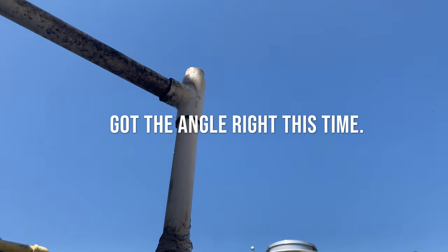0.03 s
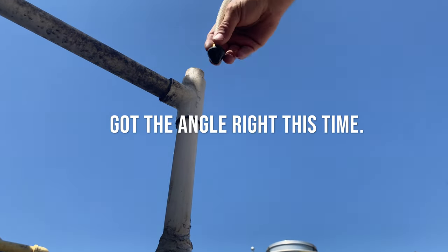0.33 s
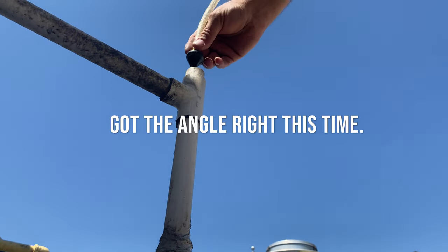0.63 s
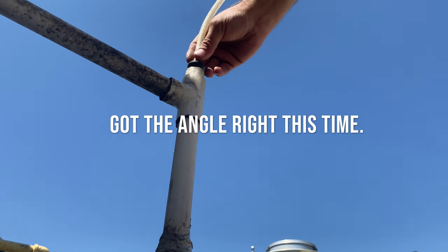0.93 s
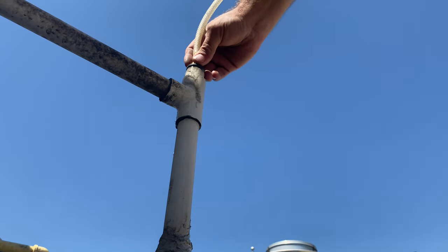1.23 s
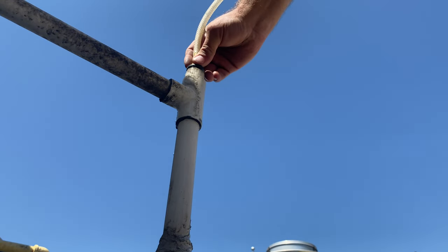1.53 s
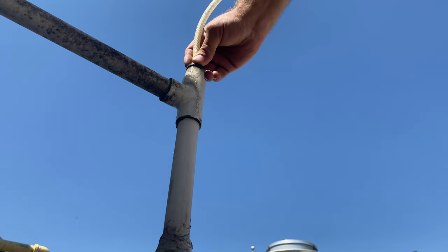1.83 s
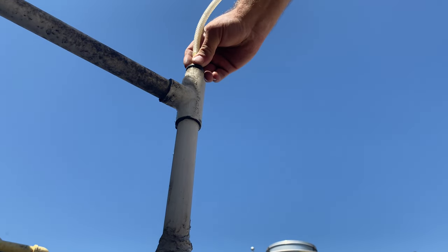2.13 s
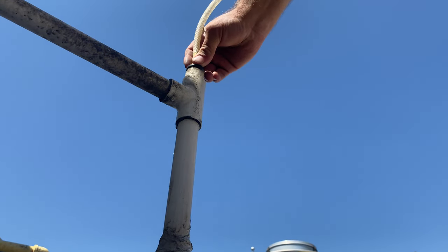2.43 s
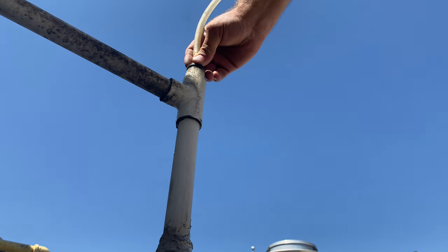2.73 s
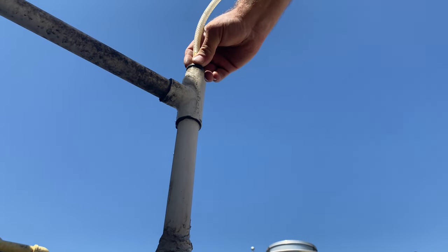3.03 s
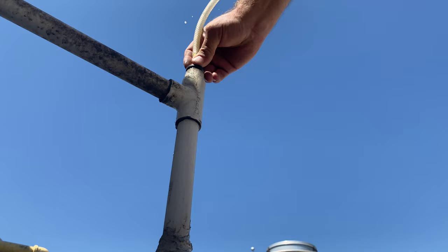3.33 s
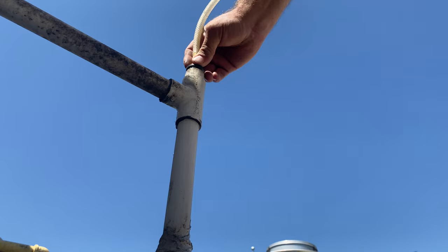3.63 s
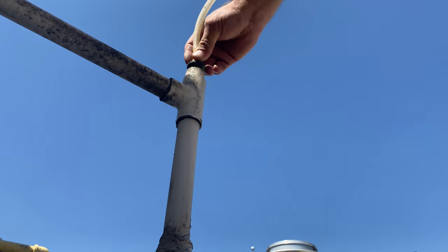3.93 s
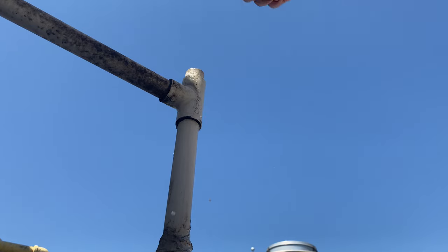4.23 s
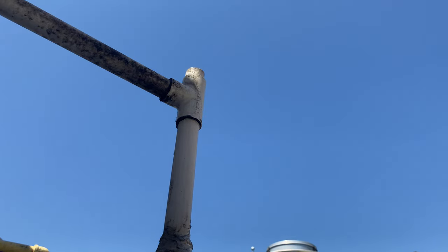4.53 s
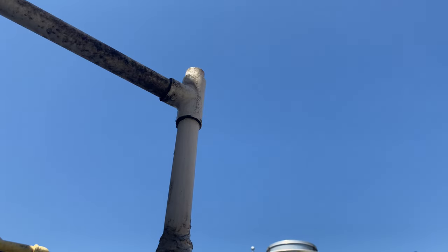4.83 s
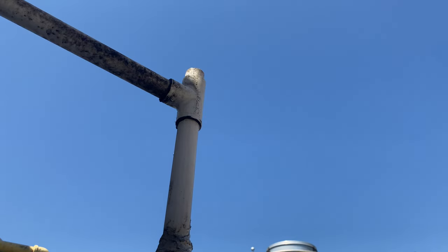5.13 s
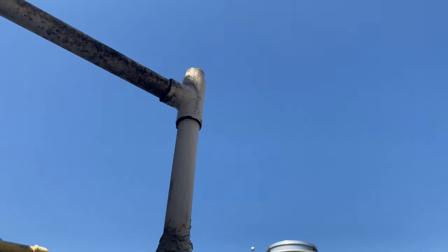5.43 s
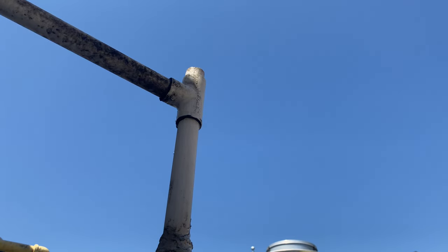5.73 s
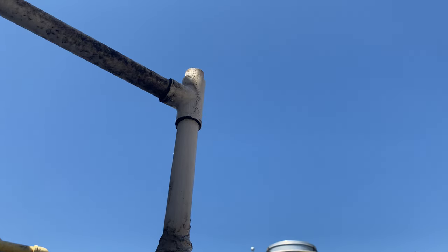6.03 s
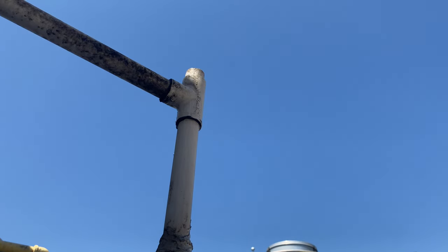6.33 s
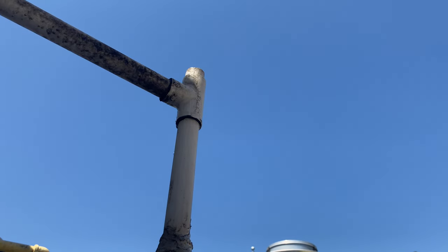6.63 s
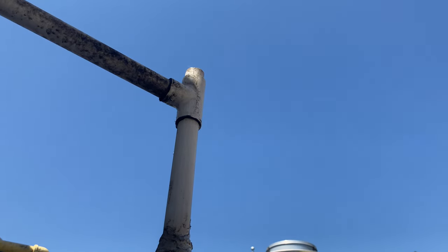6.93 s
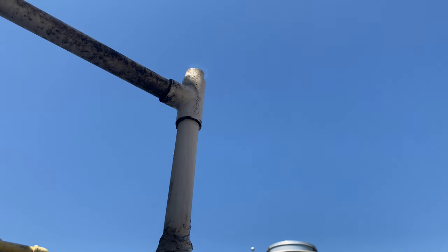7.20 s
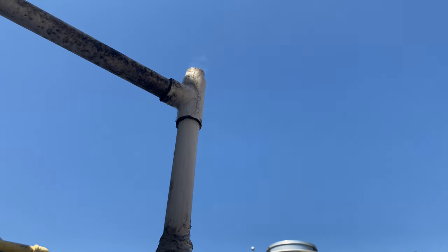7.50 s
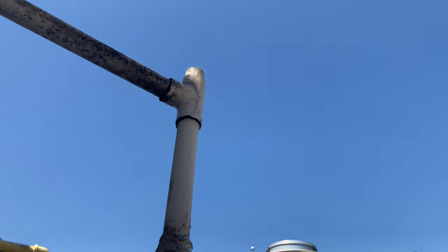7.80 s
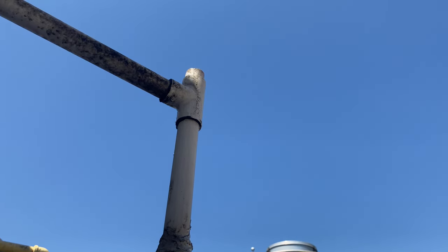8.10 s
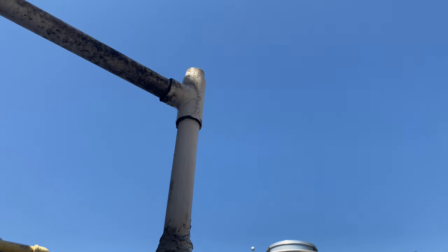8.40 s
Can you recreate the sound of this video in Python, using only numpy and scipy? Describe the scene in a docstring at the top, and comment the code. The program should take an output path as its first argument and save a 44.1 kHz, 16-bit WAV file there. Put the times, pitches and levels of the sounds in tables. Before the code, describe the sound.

A steady low roar and hum of outdoor exhaust fans, with a short wet hiss from a hose nozzle at a pipe's mouth.

```python
"""Exhaust fans drone on a flat roof throughout: roaring air, beating hums and one motor's whine.
First a hose nozzle is pressed onto an upright pipe and sizzles faintly. From about 2.4 s come low
swells: a few wind puffs, and throbs near 60 Hz like beating fan hums. At 3.1 s the nozzle lets off a
half-second jet that sputters as it starts and gargles in the pipe mouth. More sizzles and low swells
follow and, from 5.2 s, faint squeaks. Two close microphone ports (openings) pick it all up."""
import sys
import numpy as np
from scipy import signal
from scipy.fft import rfft, irfft, next_fast_len
from scipy.io import wavfile

SR = 44100
rng = np.random.default_rng(int(sys.argv[2]) if len(sys.argv) > 2 else 0)


def transcribe(signal):
    """Save signal, clipped to [-1, 1], as a 16-bit WAV file at the path in sys.argv[1]."""
    frames = np.atleast_2d(signal).T
    limited = np.clip(frames, -1, 1)
    pcm = np.round(limited * 32767).astype(np.int16)
    wavfile.write(sys.argv[1], SR, pcm)


N = 377496
TIME = np.arange(N) / SR
OPEN_S, SHUT_S = 3.116, 3.602  # the hose valve opens and shuts
OPEN_FOR_S = np.clip(TIME, OPEN_S, SHUT_S) - OPEN_S

# air passing through the fans and their ducts: (frequency [Hz], level [dB per Hz])
FAN_ROAR = [(20, -70), (40, -52.5), (58, -39), (80, -45), (115, -41.7), (180, -47.3), (255, -52.5),
            (320, -52.6), (420, -55), (560, -55.5), (740, -62), (920, -62.5), (1550, -71.5), (2600, -80.5),
            (6000, -100)]
# pitches at which the fan housings ring: (frequency [Hz], width [Hz], boost [dB])
HOUSING_RINGS = [(219.6, 9.3, 2.5), (362, 24, 4.4), (468, 27, 2.2), (1865, 90, 2.5)]


def jet(level_db=-1.5, build_db_per_s=6.5, rough_db=1.4):
    """The jet hisses in the pipe mouth while the valve is open, growing a little louder."""
    # the hiss of the jet: (frequency [Hz], level [dB])
    hiss = [(1200, -71), (2200, -81), (3700, -83), (5000, -80), (6200, -81), (7000, -72.5), (8300, -76),
            (9600, -68), (10600, -70.5), (11700, -73.5), (13700, -75), (15500, -76)]
    # pitches that ring across the pipe mouth: (frequency [Hz], width [Hz], boost [dB])
    pipe_rings = [(4230, 110, 1), (5130, 230, 1), (6920, 230, 4.5), (8050, 170, 4), (9400, 150, 2),
                  (11880, 150, -2), (15390, 220, 5.5)]
    flow = noise(hiss, pipe_rings) * valve()
    return flow * gain_of(level_db + build_db_per_s * OPEN_FOR_S + rough_db * wander(250))


def valve(attack_s=.011, release_s=.008):
    """The flow through the nozzle rises quickly, holds, then dies away."""
    opening = np.clip((TIME - OPEN_S) / attack_s, 0, 1)
    return opening * np.exp(-np.maximum(TIME - SHUT_S, 0) / release_s)


def sputter(delay_s=.013, rise_s=.012, clear_db_per_s=22, rough_db=2.0, ring_db=1.5):
    """Water arrives and chops up the stream: one full spurt, then less and less as it clears."""
    # the chopped stream: (frequency [Hz], level [dB])
    spectrum = [(500, -68), (1050, -60), (1700, -71), (2600, -73.5), (3700, -70.7), (4800, -72.3),
                (5900, -72), (6500, -80), (9000, -85), (15000, -88)]
    arrived = np.clip((OPEN_FOR_S - delay_s) / rise_s, 0, 1)
    spurt = gain_of(-9) * bump(OPEN_S + .06, half_s=.03)
    clearing = gain_of(-4 - clear_db_per_s * OPEN_FOR_S)
    spray = noise(spectrum) * valve() * arrived * (spurt + clearing) * gain_of(rough_db * wander(200))
    # the gap at the nozzle rings, wobbling higher as it fills
    ring_hz = 4400 + 800 * (1 - np.exp(-OPEN_FOR_S / .08)) + 130 * wander(30)
    return spray + gain_of(ring_db) * resonate(spray, ring_hz, width_hz=380)


def water_slugs(rough_db=2.0):
    """Slugs (small lumps) of water burst through the nozzle, each with a sharp start."""
    # the splash of a slug: (frequency [Hz], level [dB])
    splash = [(1500, -82), (3500, -72), (4900, -66), (6500, -72), (10500, -72), (15000, -78)]
    # slugs in the opening spurt: (time [s], level [dB])
    slugs = [(3.131, -2.5), (3.141, -2), (3.172, 3.5), (3.206, -4), (3.234, -2.5)]
    return noise(splash) * bursts(slugs, decay_s=.007) * gain_of(rough_db * wander(400))


def gurgle(rough_db=2.2):
    """Water that gathers in the pipe mouth gargles in short bouts."""
    # the gargling water: (frequency [Hz], level [dB])
    spectrum = [(600, -80), (1050, -64), (1450, -75), (1900, -70), (2500, -77), (3300, -89), (8000, -110)]
    # bouts of gargling: (time [s], level [dB], half length [s])
    bouts = [(3.365, -1.5, .016), (3.412, 0, .022), (3.49, -3.5, .02), (3.555, -3.5, .025)]
    return noise(spectrum) * spells(bouts) * gain_of(rough_db * wander(80))


def drops(per_s=90, low_hz=1500, high_hz=6000, fade_cycles=16, glide_per_s=4):
    """Each drop rings briefly in the pipe mouth, rising in pitch; low ones last longer."""
    out, t = np.zeros((2, N)), np.arange(2048) / SR
    jet_s = SHUT_S - OPEN_S
    for when, pitch, faintness in rng.random((round(per_s * jet_s), 3)):
        start = round((OPEN_S + when * jet_s) * SR)
        hz = low_hz * (high_hz / low_hz) ** pitch
        cycles = hz * t * (1 + glide_per_s * t / 2)
        level_db = -40 - 2.5 * np.log(faintness + .02)
        ring = gain_of(level_db) * np.exp((2j * np.pi - 1 / fade_cycles) * cycles)
        out[:, start:start + len(t)] += ports(ring, ring, hz).imag
    return out


def sizzle(level_db=-.7, rough_db=2.3):
    """The wet pipe mouth fizzes unevenly around the nozzle, with short spits that die at once."""
    # the thin fizz: (frequency [Hz], level [dB])
    spectrum = [(3500, -108), (5500, -94.5), (9000, -93.5), (13000, -91.5), (15500, -100)]
    # spells of sizzling: (time [s], level [dB], half length [s])
    sizzles = [(.15, -6, .05), (.35, -3.5, .18), (.63, -.5, .15), (.99, -2.5, .18), (1.42, -4.5, .16),
               (2.75, -7, .25), (3.66, -3, .05), (4.56, -6, .16), (5.45, -12, .3), (6.5, -10, .06),
               (7.5, -5.5, .1)]
    # the sharpest spits: (time [s], level [dB])
    spits = [(.376, 1), (.428, 2), (.58, 0), (.788, 0), (.846, 2), (1.189, 2.5), (3.633, 9), (3.642, 11),
             (5.131, 8)]
    fizz = spells(sizzles) * gain_of(level_db + rough_db * wander(60))
    return noise(spectrum) * (fizz + bursts(spits, decay_s=.006))


def fan_air(surge_db=.5, lull_db=-3.1, flicker_db=.64):
    """Air roars unsteadily in the fan housings, under a fine rush that slowly swells."""
    # air rushing over the roof: (frequency [Hz], level [dB])
    rush = [(900, -81.5), (2200, -79.5), (3500, -80.5), (5100, -84), (6200, -88.4), (9000, -91),
            (12000, -95.2), (14000, -106.5), (15500, -107)]
    # broad swells of the rush: (time [s], boost [dB], half length [s])
    swells = [(.58, 1.2, .18), (.9, 3.9, 1.05), (2.65, 1.2, .35), (4, 4.8, 1.8), (5.38, 1.1, .2),
              (7.38, 1.3, .13)]
    swell_db = lull_db + sum(boost * bump(s, half_s) for s, boost, half_s in swells)
    roar = noise(FAN_ROAR, HOUSING_RINGS) * gain_of(surge_db * wander(4))
    return roar + noise(rush) * gain_of(swell_db + flicker_db * wander(25))


def churn(octave_drop_db=9, rough_db=1.5):
    """Air tumbles in the housings in a few surges, each a band of the roar around its own pitch."""
    # surges of air: (time [s], level against the roar [dB], half length [s], pitch [Hz])
    surges = [(.25, -2, .1, 380), (.87, -2, .11, 380), (1.33, -1, .1, 200), (1.77, -1.5, .12, 290),
              (3.5, -1.5, .14, 330), (4.65, -3, .08, 400), (6.82, -1, .1, 270), (7.74, -1.5, .1, 270),
              (8.44, 0, .08, 190)]
    hz = np.geomspace(30, 4000, 40)
    out = np.zeros((2, N))
    for s, db, half_s, centre_hz in surges:
        band_db = look_up(FAN_ROAR, hz) - octave_drop_db * np.log2(hz / centre_hz) ** 2
        out += noise(np.c_[hz, band_db], HOUSING_RINGS) * gain_of(db) * bump(s, half_s)
    return out * gain_of(rough_db * wander(14))


def motor(shaft_hz=57.68):
    """The nearest motor sounds at multiples of its shaft speed; all share its slight drift."""
    # the motor's tones: (multiple of the shaft speed, level [dB])
    tones = [(1, -25), (2, -35), (5, -45.3), (11, -40.1), (12, -53.1), (13, -47.8), (14, -48.8),
             (15, -47.7), (16, -41.9), (17, -47.0), (19, -54.4), (20, -56.6), (21, -54.2), (22, -56.2),
             (24, -55.5), (25, -54.6), (28, -58), (29, -54.7), (33, -62.8)]
    drift_s = .00006 * wander(.46)
    return sum(tone(multiple * shaft_hz, db, drift_s, flutter=.19) for multiple, db in tones)


def other_fans(drift_s=.0001, drift_hz=.36):
    """Each fan runs at its own speed, so their hums beat (throb); two blade tones come and go."""
    # hums and blade tones of the other fans: (frequency [Hz], level [dB])
    steady_tones = [(52, -29.8), (59.8, -29.2), (66, -27.9), (100, -34.4), (103.9, -32.2), (120.1, -31.7),
                    (140.2, -35.9), (164.1, -34.3), (181.9, -35.3), (218.8, -37.2), (230.8, -42.9),
                    (453.9, -44.9), (545.8, -46.9), (727.9, -51.6), (875.4, -51), (1162.6, -56.2),
                    (1792.9, -57.5), (1976.5, -65), (2092.9, -68.5)]
    # a wavering pair of blade tones: (frequency [Hz], level [dB])
    blade_tones = [(349, -45), (364.3, -42)]
    hums = sum(tone(hz, db, drift_s * wander(drift_hz), flutter=.2) for hz, db in steady_tones)
    blades = sum(tone(hz, db, drift_s * wander(drift_hz), flutter=.8) for hz, db in blade_tones)
    return hums + blades


def whine():
    """A thin, broken motor whine that the air carries in and away again."""
    # two close motor tones: (frequency [Hz], level [dB])
    pair = [(1666.7, -59.5), (1677.6, -52)]
    # the whine's rise and fall: (time [s], level [dB])
    loudness = [(0, -1), (1.8, 1.5), (3.5, 1.5), (5.3, 0), (7, -4), (8.5, -2.5)]
    drift_s = .0001 * wander(.36)
    tones = sum(tone(hz, db, drift_s, flutter=.5, flutter_hz=6) for hz, db in pair)
    return gain_of(np.interp(TIME, *np.transpose(loudness))) * tones


def breeze(level_db=-14, buffet_db=4):
    """A light breeze buffets the microphone at random, most around 4.6 s."""
    # the rumble of the breeze: (frequency [Hz], level [dB])
    rumble = [(20, -71), (45, -41), (62, -35.5), (110, -38.5), (170, -45), (260, -55), (500, -73),
              (4000, -150)]
    strength = bump(4.6, half_s=1.6) * gain_of(level_db + buffet_db * wander(4))
    return noise(rumble) * strength


def low_swells(spread=1.35):
    """Lumps of low noise stand for a few wind puffs, and throbs near 60 Hz where the fan hums beat."""
    # the low swells: (time [s], level [dB], half length [s], pitch [Hz])
    swells = [(2.415, -14.5, .04, 62), (2.775, -12.6, .035, 96), (2.965, -15.5, .038, 80),
              (3.26, -20, .1, 115), (3.37, -19.5, .08, 66), (4.33, -17.5, .1, 62), (4.82, -22, .1, 60),
              (5.2, -23.5, .16, 112), (5.75, -18.5, .15, 62), (6.55, -19.5, .1, 60)]
    out = np.zeros(N)
    for s, db, half_s, hz in swells:
        band = signal.butter(2, [hz / spread, hz * spread], "band", fs=SR, output="sos")
        shape = bump(s, half_s)
        lump = shape * signal.sosfilt(band, rng.standard_normal(N))
        out += gain_of(db) * lump * np.sqrt(np.sum(shape ** 2) / np.sum(lump ** 2))
    return out


def squeaks(rise_hz_per_s=6000, width_hz=900):
    """Faint, fuzzy high squeaks, each a narrow hiss that slides upward."""
    # the squeaks: (time [s], peak level [dB per Hz], half length [s], pitch [Hz])
    events = [(5.21, -84.5, .045, 7400), (6.52, -87, .05, 7100), (7.68, -88, .03, 5800),
              (7.73, -86, .022, 6700), (7.82, -88, .045, 7500)]
    out = np.zeros(N)
    for s, db, half_s, hz in events:
        pitch = hz + rise_hz_per_s * np.clip(TIME - s, -2 * half_s, 2 * half_s)
        hiss = rng.standard_normal(N) * np.sqrt(SR / 2)
        narrowed = resonate(resonate(hiss, pitch, width_hz), pitch, width_hz)
        out += gain_of(db) * bump(s, half_s) * narrowed
    return out


def tone(hz, db, drift_s, flutter, flutter_hz=5):
    """One fan tone; moving air makes its strength and timing flutter on the way."""
    wobble = wander(flutter_hz) + 1j * wander(flutter_hz)
    air_path = (1 + flutter * wobble) / np.sqrt(1 + 2 * flutter ** 2)
    wave = air_path * np.exp(2j * np.pi * (hz * (TIME + drift_s) + rng.random()))
    return np.sqrt(2) * gain_of(db) * ports(wave, wave, hz).real


def noise(spectrum, rings=()):
    """The noise of swirling air or water, boosted where it rings, partly alike in left and right."""
    # how alike the sound is at the two ports: (frequency [Hz], likeness [0 to 1])
    likeness = [(60, .98), (120, .98), (150, 0.93), (300, 0.93), (700, 0.47), (950, 0.45), (1200, 0),
                (1700, 0.78), (2600, 0.38), (4000, .6), (5600, 0.05), (6500, .99)]
    size = next_fast_len(N)
    hz = np.fft.rfftfreq(size, 1 / SR)
    left, unrelated = rfft(rng.standard_normal((2, size)))
    alike = np.clip(look_up(likeness, hz), 0, .99)
    right = alike * left + np.sqrt(1 - alike ** 2) * unrelated
    ring_db = sum(boost / (1 + (2 * (hz - centre) / width) ** 2) for centre, width, boost in rings)
    gain = gain_of(look_up(spectrum, hz) + ring_db) * np.sqrt(SR / 2)
    return irfft(ports(left, right, hz) * gain, size)[:, :N]


def ports(left, right, hz):
    """Sound reaches the two ports with different timing and strength (takes complex signals)."""
    # how far the left wave runs ahead: (frequency [Hz], phase lead [radians])
    lead = [(200, -.15), (400, .2), (700, .9), (1000, 1.5), (1450, 3.2), (1680, 4.1), (1800, 3.7),
            (2150, 6.3), (3200, 6.9), (5000, 6.6), (7400, 6.2), (8700, 3.5), (9500, 2.9), (10700, 0),
            (11700, 0), (12800, -3), (13700, -3.2), (14700, -6.3)]
    # how much louder the left is: (frequency [Hz], left minus right [dB])
    balance = [(1200, 0), (2200, 0), (3500, 4), (5200, 5), (6600, 0)]
    turn = np.exp(.5j * look_up(lead, hz))
    side = gain_of(look_up(balance, hz) / 2)
    return np.array([left * turn * side, right / turn / side])


def resonate(x, hz, width_hz):
    """Lets through a narrow band of x that follows the moving pitch hz."""
    turn = np.exp(2j * np.pi * np.cumsum(hz) / SR)
    decay = np.exp(-np.pi * width_hz / SR)
    return 2 * (turn * signal.lfilter([1 - decay], [1, -decay], x / turn + 1e-18)).real


def wander(rate_hz, count=16384):
    """A smooth random curve of typical size 1 that wiggles up to about rate_hz."""
    hz = np.fft.rfftfreq(count, TIME[-1] / count)
    slow = irfft(rfft(rng.standard_normal(count)) * np.exp(-(hz / rate_hz) ** 2))
    return np.interp(TIME, np.linspace(0, TIME[-1], count), slow / slow.std())


def bump(s, half_s):
    """A smooth rise and fall of height 1 around the time s."""
    return np.exp(-((TIME - s) / half_s) ** 2)


def spells(rows):
    """The joint strength of soft events that each rise and fall."""
    return sum(gain_of(db) * bump(s, half_s) for s, db, half_s in rows)


def bursts(rows, decay_s):
    """The joint strength of sharp events that each start at once and fade."""
    return sum(gain_of(db) * (TIME >= s) * np.exp(-abs(TIME - s) / decay_s) for s, db in rows)


def look_up(points, hz):
    """A table's value at hz, on a log-frequency axis."""
    table_hz, value = np.transpose(points)
    return np.interp(np.log(hz + 1), np.log(table_hz + 1), value)


def gain_of(db):
    """Turns decibels into a factor to multiply by."""
    return 10 ** (np.asarray(db) / 20)


def scene():
    """The nozzle close by, the fans all around, a light breeze, low swells and faint squeaks."""
    fans = fan_air() + churn() + motor() + other_fans() + whine()
    nozzle = jet() + sputter() + water_slugs() + gurgle() + drops() + sizzle()
    return nozzle + fans + breeze() + low_swells() + squeaks()


def record(dry, low_hz=18, high_hz=15750):
    """The microphone drops the deepest bass; then the highest treble is cut off."""
    thinned = signal.sosfilt(signal.butter(2, low_hz, "high", fs=SR, output="sos"), dry)
    treble_cut = signal.firwin(511, high_hz, window=("kaiser", 9), fs=SR)
    return signal.oaconvolve(thinned, treble_cut[None], "same")


dry = scene()
out = record(dry)
transcribe(out)
```